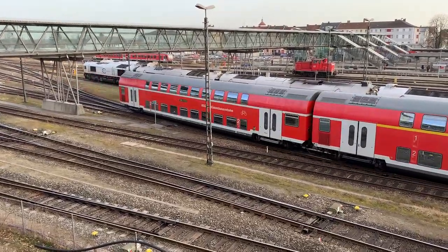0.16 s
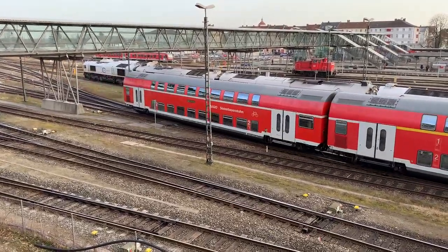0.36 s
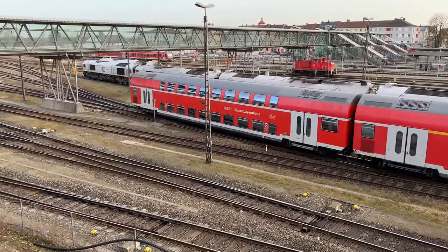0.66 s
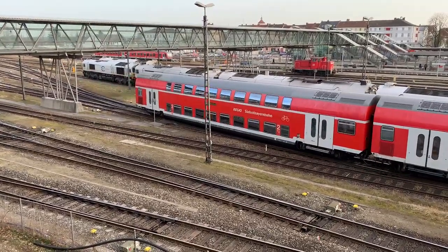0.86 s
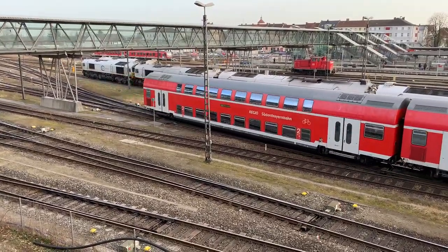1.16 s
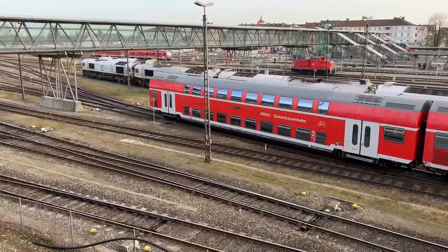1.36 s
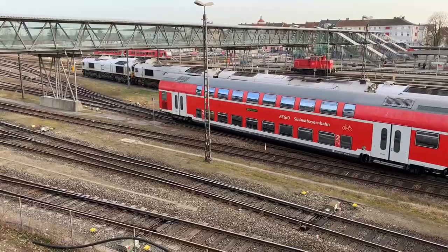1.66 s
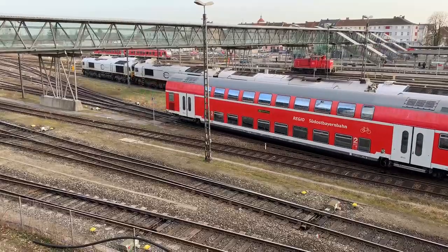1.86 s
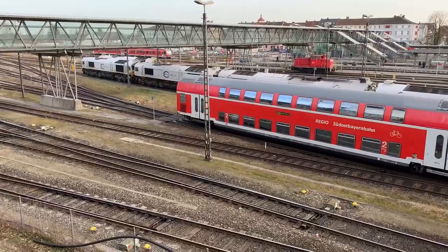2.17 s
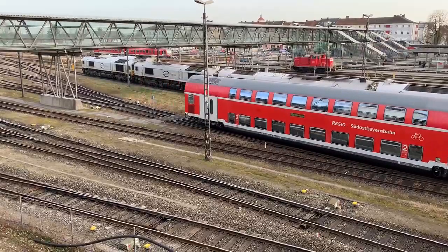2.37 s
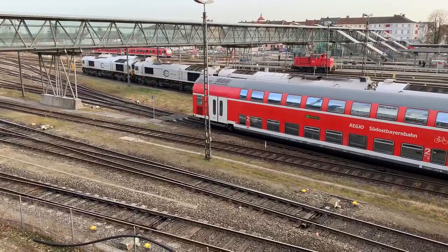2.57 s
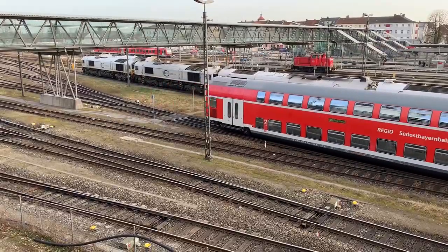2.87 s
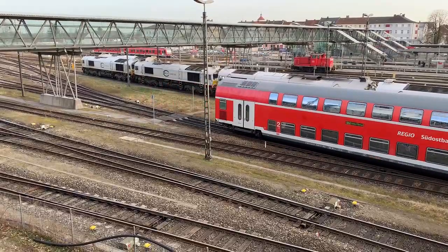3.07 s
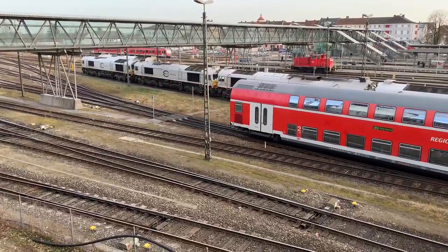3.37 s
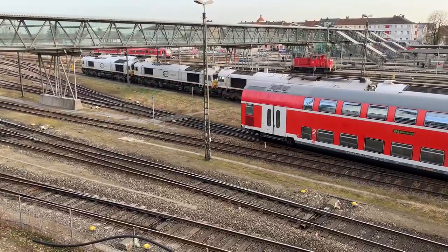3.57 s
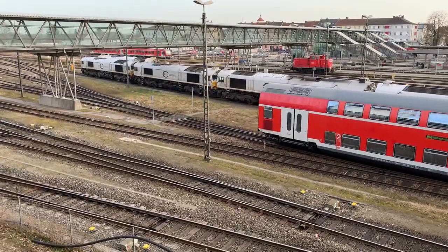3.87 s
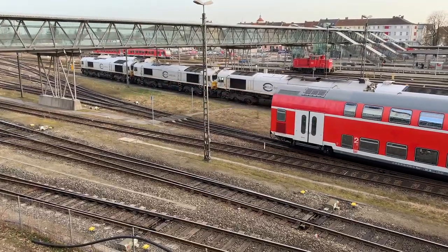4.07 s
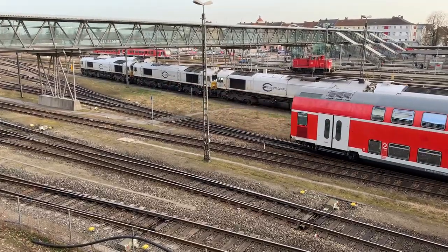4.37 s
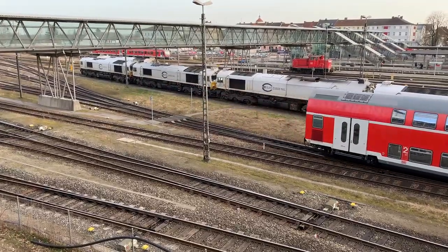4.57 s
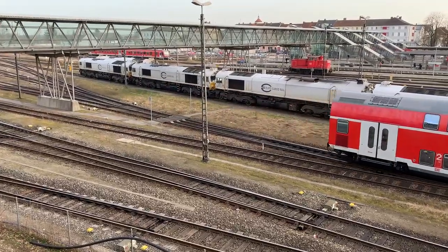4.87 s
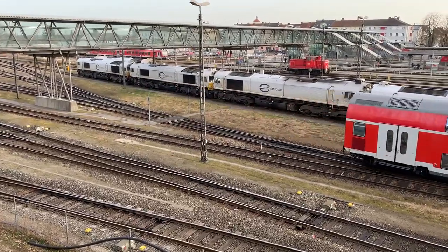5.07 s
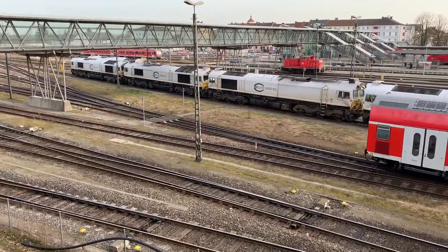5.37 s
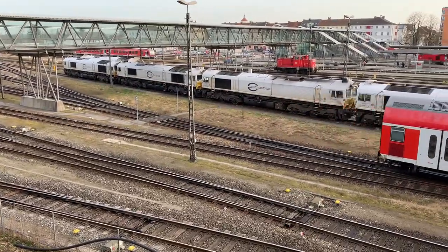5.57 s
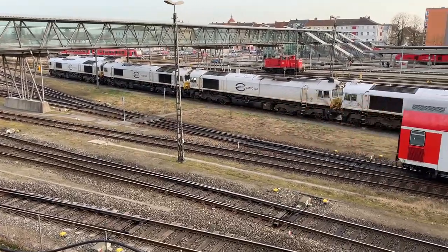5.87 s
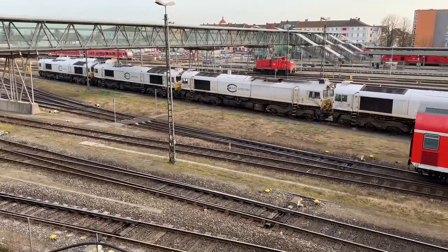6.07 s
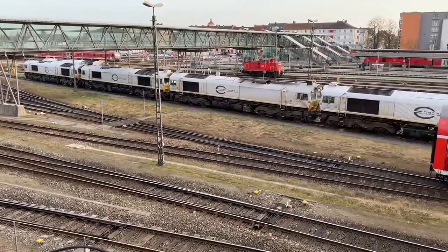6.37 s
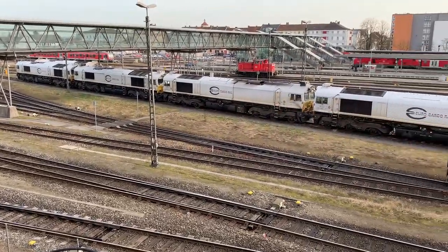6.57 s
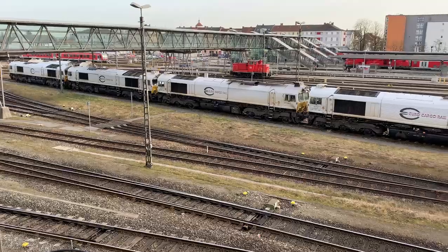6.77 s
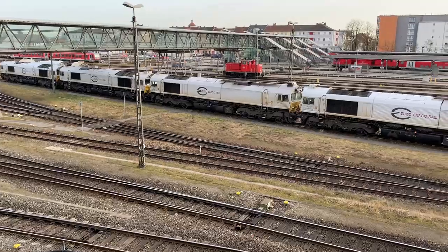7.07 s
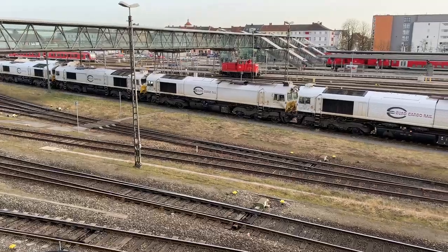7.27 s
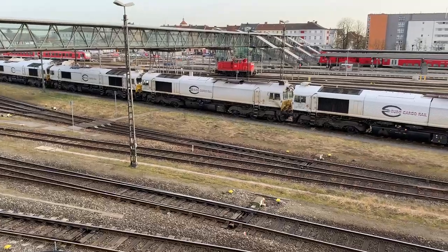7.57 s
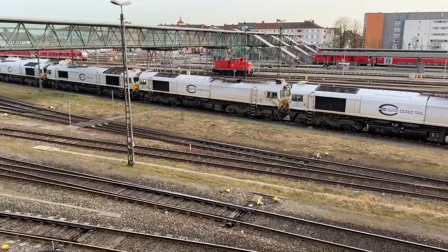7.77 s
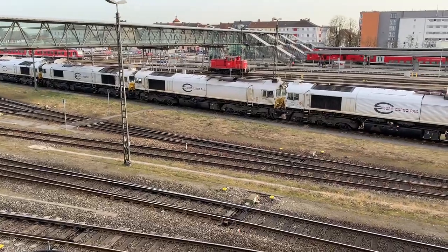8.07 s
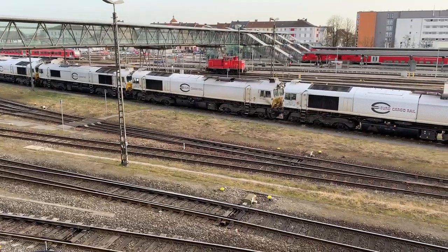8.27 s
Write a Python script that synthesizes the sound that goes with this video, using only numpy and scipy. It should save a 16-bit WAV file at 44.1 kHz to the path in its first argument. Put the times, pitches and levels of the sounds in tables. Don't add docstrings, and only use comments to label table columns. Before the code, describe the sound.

From a bridge above a rail yard, a double-deck train rolls slowly past and away. A continuous low rumble with dull far bumps runs throughout. A short flange groan and squeal comes after one second, then axles hit a rail joint in pairs: heavy thump, hard clang, boxy boom. A lone tick follows midway, then a final pair of clanks before the roar thins. Outdoor stereo, small handheld microphones, dark warm lows, light treble.

```python
import sys
import numpy as np
from scipy import signal
from scipy.fft import rfft, irfft, next_fast_len
from scipy.io import wavfile

SR = 44100
rng = np.random.default_rng(int(sys.argv[2]) if len(sys.argv) > 2 else 0)


def generate_wav(signal):
    frames = np.transpose(np.atleast_2d(signal))
    scaled = np.clip(frames, -1, 1) * 32767
    pcm = np.round(scaled).astype(np.int16)
    wavfile.write(sys.argv[1], SR, pcm)


def voltage_ratio(decibels):
    exponent = np.asarray(decibels, float) / 20
    return 10 ** exponent


N = 370876
STEP = 16

# [start_s, pitch_hz, level_db, t60_s]
TRAFFIC = [
    (.62, 57.5, -42, 0.65),
    (1.36, 55.3, -23.5, 0.88),
    (1.85, 48.6, -30, .8),
    (2.5, 56.4, -25, 0.74),
    (2.95, 56.8, -23, 0.7),
    (4.75, 59, -25, 0.37),
    (5.8, 50.7, -23, 0.46),
    (6.83, 52.8, -22, 1.6),
    (7.22, 51, -35, 1.2),
    (8.24, 60.4, -32, 0.45),
]
# [time_s, level_db]
ROLL = [(0.0, -40.5), (0.42, -39.5), (2.69, -40.5), (2.81, -40.5), (3.25, -40), (4.24, -41.5), (4.61, -41),
        (6.53, -42), (8.41, -43.5)]
ROLL_HZ = [50, 180, 800, 3200]
FOLLOWS = [.1, 0.11, 1.46, 0.84, 1.3]
# [time_s, nearness_0_1, loose_sleeper_load_0_1]
PASSES = [
    (1.1, 0.9, .01),
    (1.981, 0.5, 0.2),
    (3.1, 1, 1),
    (6.38, 0.5, 0.3),
]
BOGIE_DB, BOGIE_NEAR_S = [1.2, 2.2, .1, 1.3, 5.3], 0.76
# [pitch_hz, level_db_per_hz]
ROAR = [(25, -29), (48, -0.5), (120, -4.5), (170, -5.5), (300, -9.5), (420, -12.5), (800, -17.5),
        (1000, -22), (2700, -34.5), (5000, -51.5), (6500, -50.5), (8200, -48.5), (10300, -48.5),
        (15000, -77.5)]
ROAR_DB, PATCH_TILT = -7.5, -0.067
# [pitch_hz, level_db_per_hz, t60_s]
CRASH = [(100, 5.5, 0.39), (256, 19, 0.17), (435, 8, 0.19), (600, 8, 0.34), (800, 9, 0.5),
         (1420, -5.5, 0.61), (2640, -5.5, 0.72), (3230, -7.5, 0.84), (4400, -11, 0.8), (6940, -12.5, 0.44),
         (9700, 12, 0.18), (14700, -16, 0.06)]
CRASH_RISE_S, RATTLE_DB = 0.0064, -5.5
# [pitch_hz, width_hz, level_db]
SINGING = [(60.5, 5.5, -48.5), (258.8, 23.6, -37), (702, 7, -54), (822, 39, -52), (1398, 21, -58.5),
           (2096, 42, -58), (2632, 28, -67), (3360, 32, -68.5), (4210, 250, -66), (4720, 22, -76.5),
           (5020, 250, -70.5), (6025, 30, -83.5), (6440, 25, -82)]
# [pitch_hz, likeness_0_1, left_minus_right_db]
STEREO = [(60, .84, 2.6), (150, .92, 3.2), (270, .91, 2.0), (480, .76, 4.2), (860, .62, 4.0),
          (1300, .2, 3.2), (2500, .25, 3.6), (4300, .2, 1.5), (5500, 0, -3.0), (6800, 0, 0)]

# [start_s, pitch_hz, level_db, t60_s]
BUMPS = [(.02, 125, -28, 0.71), (.095, 170.8, -26.5, 0.91), (.199, 157, -25, 0.5), (.281, 159.3, -24, 0.51),
         (.41, 239.6, -23.5, 0.32), (1.0, 192.8, -26.5, 0.97), (1.59, 173.5, -23, 0.19),
         (1.955, 170, -25.5, 0.37), (2.04, 178, -27.5, 0.51), (2.465, 250, -25, 0.61),
         (2.573, 259, -26, 0.98), (2.759, 212.8, -23, 0.39), (3.19, 153, -21.5, 0.13),
         (3.59, 230, -24, 0.32), (4.76, 255, -26, 1), (5.13, 256, -27, 0.089), (5.95, 145.8, -25.5, 0.26),
         (6.36, 135, -28, 0.23), (6.861, 250, -32, 0.54), (8.085, 136, -29, 0.22), (2.79, 429, -27, 0.29),
         (3.18, 104, -24, 0.28), (3.72, 125.3, -27, 0.28), (5.955, 261, -25, 0.32),
         (6.44, 178.5, -27.5, 0.33), (7.34, 178.5, -29, 0.39), (.5, 194, -23.5, 0.14),
         (4.85, 310, -29.5, 0.2)]
# [start_s, level_db, pitch_hz, t60_s]
THUDS = [(0.104, -18, 250, 0.08), (0.145, -21, 183, 0.08), (0.289, -18, 175, 0.08), (0.372, -20, 156, 0.08),
         (0.413, -19, 245, 0.08), (0.456, -21, 167, 0.08), (0.534, -22, 229, 0.08), (1.063, -22, 151, 0.08),
         (1.162, -20, 199, 0.08), (1.592, -20, 178, 0.08), (1.989, -22, 178, 0.08), (2.468, -18, 250, 0.08),
         (2.599, -19, 242, 0.08), (2.684, -19, 167, 0.08), (2.786, -19, 153, 0.08), (2.829, -19, 175, 0.08),
         (3.585, -19, 248, 0.08), (3.72, -19, 240, 0.08), (4.827, -19, 261, 0.08), (4.899, -22, 258, 0.08),
         (5.135, -20, 256, 0.08), (5.509, -23, 328, 0.08), (5.614, -23, 253, 0.08), (6.834, -23, 151, 0.08)]
THUD_DB = -6
# [start_s, level_db, t60_s, pitch_hz]
GRIT = [(3.31, -51, .1, 6000), (3.7, -60, .25, 6200), (6.4, -60, .4, 5500), (1.5, -60, .3, 6600),
        (.3, -59, .4, 5000), (7.0, -62, .3, 4900), (1.77, -34, .06, 1800), (1.775, -46, .12, 5500),
        (6.181, -36, .06, 1300), (6.586, -37, .07, 1300), (3.309, -38, .06, 1500), (5.294, -46, .05, 8000),
        (6.19, -40, .05, 8300)]
# [start_s, pitch_hz, level_db, t60_s]
SQUEALS = [
    (.33, 1730, -35.5, 0.24),
    (1.16, 1430, -50, 0.6),
    (1.23, 1400, -50, .4),
    (1.15, 1140, -44, 0.33),
    (1.24, 1056, -34, 0.27),
    (1.33, 1170, -35, 0.32),
    (7.5, 290, -23, 0.69),
]
# [start_s, pitch_hz, level_db, t60_s]
PINGS = [(2.2, 583, -28, 0.32), (2.803, 4740, -47, 0.1), (3.208, 4500, -54, 0.1),
         (5.294, 3800, -38.5, 0.038), (3.4, 5600, -53, 0.2), (4.9, 910, -35, 0.047),
         (5.295, 2100, -42, 0.093), (5.29, 1410, -38, .08), (2.45, 640, -36, 0.3), (4.86, 520, -32.5, 0.36),
         (5.3, 860, -41, 0.27)]
TRAFFIC_SHAPE, BUMP_SHAPE = (0.056, 0.057), (0.024, 0.03)
SQUEAL_SHAPE, PING_SHAPE = (0.12, 0.007), (0.011, 0.086)
# [start_s, length_s, from_hz, to_hz, level_db]
WHISTLES = [
    (1.3, 0.082, 1415, 1455, -43.5),
    (1.23, 0.065, 1440, 1385, -41.5),
    (1.145, 0.085, 1300, 1150, -45),
    (1.28, 0.036, 1185, 1170, -36.5),
    (1.4, 0.088, 1075, 1130, -40),
    (1.275, 0.054, 1030, 1300, -41),
    (1.33, .07, 1200, 1120, -44),
]
# [start_s, peak_db, t60_s, body_re_top_db]
CLINKS = [(0.4414, -56.5, 0.12, 15), (0.9098, -58, 0.1, -11), (1.0246, -57, 0.34, 0), (1.045, -51, 0.4, -4),
          (1.07, -50.5, 0.26, -7), (1.0924, -56, 0.25, 0), (1.2201, -72, 0.11, -17),
          (1.461, -55.5, 0.45, 12), (1.9545, -54.5, 0.17, 12), (2.0163, -67, 0.15, -6),
          (2.159, -64, 0.48, 5), (2.3121, -60, 0.15, -6), (2.6693, -57, 0.099, -3), (2.807, -65, 0.12, -12),
          (3.08, -49, 0.044, -5), (3.2096, -59, 0.15, 21), (3.6875, -61, 0.29, 14), (3.9085, -71, 0.15, -8),
          (4.4144, -74, 0.16, 1), (4.7745, -66, 0.13, -6), (5.293, -43.5, 0.042, -12),
          (6.361, -52.5, 0.072, -2), (6.9716, -67, 0.19, -6), (7.3018, -76, 0.14, -15),
          (7.8594, -73, 0.15, -2), (8.2621, -68, 0.19, 1)]
CLINK_RISE_S = 0.0028
# [pitch_hz, width_hz, level_db]
JINGLE = [(9950, 950, -16), (10200, 60, -33.5), (10400, 60, -40), (10700, 68, -38.5), (14200, 400, -45)]
# [start_s, peak_db, t60_s]
TICKS = [
    (5.295, -37, 0.035),
    (5.299, -50.5, 0.07),
    (7.302, -52, 0.056),
]
# [start_s, peak_db, t60_s]
SNAPS = [(1.781, -35, .03), (2.197, -45, 0.045), (2.905, -40, 0.026), (1.463, -49, .04), (1.956, -50, .04),
         (3.081, -42, .03), (3.309, -48, .05), (5.2945, -36, 0.026), (5.301, -44, 0.049), (5.311, -48, .06),
         (6.19, -36.5, 0.038), (6.5935, -36, 0.015), (6.1895, -30, .012), (1.7805, -32, .012),
         (2.9055, -33, .01), (3.075, -46, .01), (6.362, -44, .015), (6.373, -46, .015), (3.339, -44, .015),
         (3.21, -52, .02)]
SNAP_HZ = 7700
# [start_s, pitch_hz, level_db, t60_s]
NOTES = [(.91, 10800, -40, .15), (1.05, 10560, -34, 0.37), (1.075, 10330, -32, 0.35), (1.1, 10860, -39, .3),
         (1.1, 14800, -45, .15), (1.462, 10400, -34, .1), (1.474, 10900, -36, .12),
         (1.492, 10800, -38, .15), (1.468, 14700, -44, .1), (1.492, 14600, -43, .15),
         (1.781, 10400, -25, .06), (1.781, 14900, -30, .03), (1.79, 10500, -32, .12),
         (1.844, 14800, -38, .02), (2.187, 2200, -35, .08), (2.19, 2760, -38.5, 0.17),
         (2.225, 2850, -45, 0.18), (2.196, 10400, -34, 0.11), (2.197, 14800, -34, .05),
         (2.228, 14600, -39, .04), (2.312, 10700, -44, .05), (2.895, 2730, -35, .12),
         (2.895, 2960, -42, 0.089), (2.95, 2625, -41, .3), (2.906, 14800, -29, 0.022),
         (2.906, 10300, -28, .03), (2.915, 10500, -32, .15), (3.075, 11500, -44, .01),
         (3.081, 10800, -34, .05), (3.082, 14600, -38, .03), (3.31, 2615, -42.5, 0.85),
         (3.31, 3010, -38.5, 0.16), (3.312, 2130, -39.5, .2), (3.31, 12500, -36, .06),
         (3.31, 14800, -41, 0.072), (3.339, 15000, -35, .02), (3.339, 11500, -36, .02),
         (3.33, 10400, -34.5, 0.17), (3.92, 10700, -50, 0.17), (5.119, 10300, -47, .04),
         (5.295, 11100, -30, .03), (6.19, 10400, -26, 0.037), (6.19, 14700, -35, .03),
         (6.362, 9700, -28, 0.033), (6.373, 10100, -32, .03), (6.362, 15000, -42, .02),
         (6.594, 10300, -19, .025), (6.594, 14900, -34, .02), (6.588, 2620, -38.5, .3),
         (6.64, 2620, -44, .15), (6.69, 2630, -43, .15), (6.745, 2620, -45, .12), (6.2, 2660, -46, .3),
           (3.34, 2050, -44, .4), (2.805, 4700, -46, .1), (3.04, 2090, -46, .3), (2.93, 255, -22, .2),
           (3.7, 10300, -40, .15), (3.7, 6100, -58, .1), (1.955, 10500, -36, .15), (2.16, 10300, -42, .3),
           (3.21, 10200, -42, .2), (1.771, 2300, -36, .06), (1.772, 1300, -36, .08),
           (6.181, 2900, -36, .08), (6.181, 2150, -36, .12), (6.587, 3000, -38, .06),
           (3.311, 1560, -38, .2), (3.311, 620, -32, .3), (2.993, 150, -20, .03), (3.189, 150, -19, .03),
           (3.352, 170, -18, .03), (6.614, 200, -18, .03), (2.247, 200, -20, .04), (6.65, 260, -24, .15),
           (6.245, 260, -24, .2)]
NOTE_RISE_S = 0.00072

# [start_s, clang_db, thump_re_clang_db, after_blows_db, wheel_ring_db]
JOINTS = [
    (1.77, -31.5, 8, -5.5, -10),
    (2.1865, -30.5, 7, -7, -18),
    (2.8943, -30.5, 4.5, -8, 6),
    (3.309, -33.5, 8.5, -10, 8),
    (6.1807, -29, 1.5, -7.5, 10),
    (6.5853, -33, 6, -10, 4),
]
# [delay_s, thump_db, clang_db, rattle_db]
BLOW = [
    (0, 4, 1, -5),
    (.011, -31, -3.5, 2),
    (0.02, -0.5, -18, -8),
    (.045, -31, -12.5, 0),
    (0.06, 3.5, -4, 0),
]
# [pitch_hz, level_db, beat_hz, t60_s]
BOOMS = [(250, -17, 9.5, 0.45), (255, -15.5, 5.1, 0.34), (258.3, -12.5, 7, 0.37), (260, -7, 7.6, 0.2),
         (261.8, -12, 9.2, 0.35), (259.6, -10.5, 8.7, 0.44)]
# [pitch_hz, level_db, t60_s]
THUMP = [(186.8, 1, 0.19), (290, -6, 0.026), (338, -22, 0.038), (410, -33, 0.072), (582, -31, 0.042),
         (720, -23, 0.06)]
# [pitch_hz, level_db, t60_s]
PUSH = [(230, 3, 0.023), (360, 4, 0.017), (500, -15, 0.017), (920, -14, 0.054)]
# [pitch_hz, level_db, t60_s]
KNOCK = [(312, 15.5, 0.067), (487, 8, 0.054), (675, 0.5, 0.16), (1084, -1.5, .05), (2260, 1, 0.073),
         (2450, -9, 0.052), (2934, -2, 0.089), (3300, -9, 0.058), (3500, -15, 0.05)]
# [pitch_hz, level_db, t60_s]
CLANG = [(520, 7, 0.063), (860, 3, 0.08), (1305, -4.5, 0.12), (1595, -8, 0.066), (1860, -9, 0.058),
         (2140, -4, 0.057), (2420, -16, .05), (2750, -7, 0.037), (2760, -3.5, 0.056), (3330, -13, 0.069),
         (3540, -17, 0.037), (4020, -12.5, 0.13)]
# [pitch_hz, level_db, t60_s]
WHEEL = [(2110, -16, .4), (2604, -19, .4), (2623, -13, .8), (2670, -15, .2), (3380, -23, .3)]
# [pitch_hz, level_db, t60_s]
CLIPS = [(9200, -8, 0.018), (10600, -2, .02), (11400, -10, .012), (12200, -10, .01), (14200, -24, .012),
         (14800, -24, .015)]
CRACK_DB, CRACK_T60_S, CRACK_HZ = 2.5, 0.04, [500, 3200]

# [pitch_hz, width_hz, level_db]
PORT_PEAKS = [(10400, 800, -2.5), (14750, 530, 3.5)]
TREBLE_HZ, PORT_LAG = 6600, 10
SHELF_HZ, SHELF_SHARE = 6910, 0.87
BASS_HZ, BASS_LAG = 1800, 5
LIMIT, EDGE_S = 0.44, .003


def at_hz(points, hz, axis=1):
    points = np.array(points)
    return np.interp(np.log(hz), np.log(points[:, 0]), points[:, axis])


def fine(coarse):
    return np.interp(np.arange(N) / STEP, np.arange(len(coarse)), coarse)


def drift(rate_hz):
    r = np.exp(-2 * np.pi * STEP * rate_hz / SR)
    settle = 4000
    slow = signal.lfilter([1], [1, -2 * r, r * r], rng.standard_normal(N // STEP + 2 + settle))[settle:]
    return slow / slow.std()


def filtered(x, order, hz, kind="low"):
    return signal.sosfilt(signal.butter(order, hz, kind, fs=SR, output="sos"), x)


def filtered_in_place(x, order, hz, kind="low"):
    return signal.sosfiltfilt(signal.butter(order, hz, kind, fs=SR, output="sos"), x)


def resonate(x, hz, width_hz):
    r = np.exp(-np.pi * width_hz / SR)
    poles = [1, -2 * r * np.cos(2 * np.pi * hz / SR), r * r]
    return np.sqrt(1 - r * r) * signal.lfilter([1, 0, -1], poles, x) / np.sqrt(2)


def swell(s, rise_s, t60):
    start = round(s * SR)
    t = np.arange(min(SR // 2, N - start)) / SR
    rise = (1 - np.exp(-t / max(rise_s, 1e-4))) ** 2
    return slice(start, start + len(t)), rise * voltage_ratio(-60 * t / t60)


def swells(events, rise_s):
    out = np.zeros(N)
    for s, level_db, t60 in events:
        where, shape = swell(s, rise_s, t60)
        out[where] += voltage_ratio(level_db) * shape
    return out


def spread(mid, side, hz):
    alike = at_hz(STEREO, hz)
    lean_db = at_hz(STEREO, hz, axis=2) * np.array([[.5], [-.5]])
    pair = np.sqrt(1 + alike) * mid + np.sqrt(1 - alike) * side * [[1], [-1]]
    return pair * voltage_ratio(lean_db) / np.sqrt(2)


def narrow_tones(events, rise_share, width_share):
    out = np.zeros((2, N))
    for s, hz, level_db, t60 in events:
        where, shape = swell(s, rise_share * t60, t60)
        tone = resonate(rng.standard_normal((2, SR)), hz, width_share * hz)
        tone = resonate(tone, hz, .5 * hz)[:, -len(shape):]
        rms = np.sqrt(np.average(tone ** 2, axis=1, weights=shape ** 2))
        out[:, where] += voltage_ratio(level_db) * shape * spread(*(tone / rms[:, None]), hz)
    return out


def dying_sines(events):
    out = np.zeros((2, N))
    for s, hz, level_db, t60 in events:
        where, shape = swell(s, max(NOTE_RISE_S, .5 / hz), t60)
        tone = voltage_ratio(level_db) * shape * np.sin(2 * np.pi * hz * np.arange(len(shape)) / SR)
        out[:, where] += spread(tone, 0.33 * tone, hz)
    return out


def town_traffic():
    return narrow_tones(TRAFFIC, *TRAFFIC_SHAPE)


def far_bumps():
    return narrow_tones(BUMPS, *BUMP_SHAPE)


def thuds():
    return dying_sines([(s, hz, level_db + THUD_DB, t60) for s, level_db, hz, t60 in THUDS])


def rolling_swing():
    t = np.arange(N // STEP + 2) * STEP / SR
    s, level_db = np.transpose(ROLL)
    at, near, load = np.transpose(PASSES)
    bell = np.exp(-.5 * ((t[:, None] - at) / BOGIE_NEAR_S) ** 2)
    lift = np.array([bell @ load] * 3 + [bell @ near] * 2)
    lift_db = np.array(BOGIE_DB)[:, None] * (lift - lift.mean(axis=1, keepdims=True))
    return np.outer(FOLLOWS, np.interp(t, s, level_db - level_db.mean())) + lift_db


def blows(kind):
    s, clang_db, thump_db, after_db, ring_db = np.transpose(JOINTS)
    column, extra_db = {"thump": (1, thump_db), "clang": (2, 0),
                        "rattle": (3, RATTLE_DB), "ring": (2, ring_db)}[kind]
    at = np.array([np.round((s + part[0]) * SR) for part in BLOW], int)
    level_db = [clang_db + extra_db + part[column] + after_db * (k > 1) for k, part in enumerate(BLOW)]
    return at.ravel(), np.ravel(level_db)


def crash_power(hz):
    at, level_db = blows("thump" if hz < 600 else "clang" if hz < 7500 else "rattle")
    kicks = np.zeros(N // STEP + 2) + 1e-30
    kicks[at // STEP + 1] = voltage_ratio(level_db + at_hz(CRASH, hz)) ** 2
    decay = voltage_ratio(-120 * STEP / (at_hz(CRASH, hz, axis=2) * SR))
    rise = np.exp(-STEP / (CRASH_RISE_S * SR))
    return signal.lfilter([1 - rise], [1, -rise], signal.lfilter([1], [1, -decay], kicks))


def roar_and_crash(patchy_db=1.76, together_db=0.27, chatter_db=2.5):
    curves = rolling_swing()
    places = np.log(ROLL_HZ + [6800])
    size = next_fast_len(N)
    white = rfft(rng.standard_normal((2, 2, size)))
    together_db = together_db * drift(6.1)
    chatter = voltage_ratio(chatter_db * drift(54)) ** 2
    thirds = 3 * np.log2(np.arange(size // 2 + 1) * SR / size + 1e-9)
    out = 0
    for k in range(15, 43):
        hz = 2 ** (k / 3)
        weights = [np.interp(np.log(hz), places, row) for row in np.eye(5)]
        patches_db = patchy_db * (hz / 500) ** PATCH_TILT * drift(12.3)
        rolling = voltage_ratio(ROAR_DB + at_hz(ROAR, hz) + weights @ curves + together_db + patches_db)
        level = np.sqrt(rolling ** 2 + chatter * crash_power(hz))
        window = np.cos(np.clip(thirds - k, -1, 1) * np.pi / 2)
        mid, side = irfft(white[k % 2] * window, size)[:, :N]
        out = out + fine(level) * spread(mid, side, hz)
    return out


def singing():
    size = next_fast_len(N)
    white = rfft(rng.standard_normal((2, size)))
    f = np.arange(size // 2 + 1) * SR / size
    rumble_db, body_db, rail_db, wheel_db, hiss_db = rolling_swing()
    out = 0
    for hz, width_hz, level_db in SINGING:
        follow_db = rumble_db if hz < 80 else body_db if hz < 400 else rail_db if hz < 1000 else 0.4 * wheel_db
        tone = irfft(white / (1 + ((f - hz) / width_hz) ** 2), size)[:, :N]
        level = voltage_ratio(level_db + follow_db + 1.3 * drift(6.9))
        out = out + fine(level) * spread(*(tone / tone.std()), hz)
    return out


def grit():
    out = np.zeros((2, N))
    for s, level_db, t60, hz in GRIT:
        where, shape = swell(s, .15 * t60, t60)
        out[:, where] += voltage_ratio(level_db) * shape * resonate(rng.standard_normal((2, len(shape))), hz, 2500)
    return out


def squeals():
    return narrow_tones(SQUEALS, *SQUEAL_SHAPE)


def whistles():
    out = np.zeros((2, N))
    for s, length_s, from_hz, to_hz, level_db in WHISTLES:
        part = np.linspace(0, 1, round(length_s * SR))
        phase = 2 * np.pi * np.cumsum(from_hz + (to_hz - from_hz) * part) / SR
        tone = np.sin(np.pi * part) ** .5 * np.sin(phase)
        start = round(s * SR)
        out[:, start:start + len(part)] += voltage_ratio(level_db) * spread(tone, 0.3 * tone, from_hz)
    return out


def clinks():
    top = swells([(s, level_db + 17, t60) for s, level_db, t60, body_db in CLINKS], CLINK_RISE_S)
    body = swells([(s, level_db + body_db, t60) for s, level_db, t60, body_db in CLINKS], CLINK_RISE_S)
    white = rng.standard_normal((2, N))

    def twice(hz, width_hz):
        return resonate(resonate(white, hz, width_hz), hz, width_hz)

    jingle = sum(voltage_ratio(level_db) * twice(hz, width_hz) for hz, width_hz, level_db in JINGLE)
    return top * jingle + 0.2 * body * twice(6800, 2800)


def ticks():
    return swells(TICKS, .0003) * filtered(rng.standard_normal((2, N)), 2, [2600, 15000], "band")


def snaps():
    return swells(SNAPS, .0002) * filtered(rng.standard_normal((2, N)), 2, [SNAP_HZ, 15500], "band")


def pings():
    return narrow_tones(PINGS, *PING_SHAPE)


def notes():
    return dying_sines(NOTES)


def car_body():
    out = np.zeros(N)
    for joint, (hz, level_db, beat_hz, t60) in zip(JOINTS, BOOMS):
        where, shape = swell(joint[0], .002, t60)
        turn = 2 * np.pi * np.arange(len(shape)) / SR
        out[where] += voltage_ratio(level_db) * shape * np.sin(beat_hz * turn) ** 2 * np.sin(hz * turn)
    return spread(out, 0.3 * out, 258)


def crack():
    at, level_db = blows("clang")
    kicks = np.zeros(N) + 1e-18
    kicks[at] = voltage_ratio(level_db + CRACK_DB)
    envelope = signal.lfilter([1], [1, -voltage_ratio(-60 / (CRACK_T60_S * SR))], kicks)
    burst = envelope * rng.standard_normal((2, N))
    return spread(*filtered(burst, 3, CRACK_HZ, "band"), 950)


def struck(modes, kind, level_db, scatter_db):
    at, blow_db = blows(kind)
    out = 0
    for hz, mode_db, t60 in modes:
        clicks = np.zeros((2, N)) + 1e-18
        chance = rng.standard_normal((3, len(at)))
        strength = voltage_ratio(blow_db + mode_db + level_db + scatter_db * chance[0])
        clicks[:, at] = strength * np.sign(chance[1:])
        r, w = voltage_ratio(-60 / (t60 * SR)), 2 * np.pi * hz / SR
        ringing = signal.lfilter([0, np.sin(w)], [1, -2 * r * np.cos(w), r * r], clicks)
        out = out + spread(*ringing, hz)
    return out


def joint_thump():
    return filtered(struck(THUMP, "thump", -2.3, scatter_db=1.5), 2, 900)


def joint_knock():
    push = struck(PUSH, "thump", -12, scatter_db=0)
    knock = struck(KNOCK, "clang", -7, scatter_db=0)
    return push + knock + struck(CLIPS, "rattle", 3.1, scatter_db=3.5)


def joint_clang():
    flicker = fine(voltage_ratio(3 * drift(22)))
    ring = struck(WHEEL, "ring", -13.5, scatter_db=1.5)
    return struck(CLANG, "clang", -4.5, scatter_db=2.5) + flicker * ring


def scene():
    rolling = roar_and_crash() + singing() + grit()
    groans = town_traffic() + far_bumps() + squeals() + whistles() + pings()
    dulled = filtered(groans + joint_clang(), 2, 5000)
    grain = fine(voltage_ratio(3 * drift(70)))
    fittings = grain * (clinks() + ticks() + snaps())
    joints = car_body() + crack() + joint_thump() + joint_knock()
    return rolling + dulled + fittings + thuds() + notes() + joints


def band_limit(x):
    return signal.sosfilt(signal.butter(12, 16530, fs=SR, output="sos"), x)


def record(dry):
    treble = filtered_in_place(dry, 4, TREBLE_HZ, "high")
    port = treble[1] - SHELF_SHARE * filtered_in_place(treble[1], 10, SHELF_HZ, "high")
    for hz, width_hz, peak_db in PORT_PEAKS:
        port = port + voltage_ratio(peak_db) * signal.lfilter(*signal.iirpeak(hz, hz / width_hz, SR), port)
    port = filtered(port, 8, 15300)
    x = dry - treble + [-np.roll(port, PORT_LAG), port]
    bass = filtered_in_place(dry[0], 10, BASS_HZ)
    x[0] += np.roll(bass, BASS_LAG) - bass
    x = filtered(x, 2, 34, "high")
    x = LIMIT * np.tanh(x / LIMIT)
    x = x * np.clip(np.arange(N)[::-1] / (EDGE_S * SR), 0, 1)
    return band_limit(x)


dry = scene()
out = record(dry)
generate_wav(out)
```